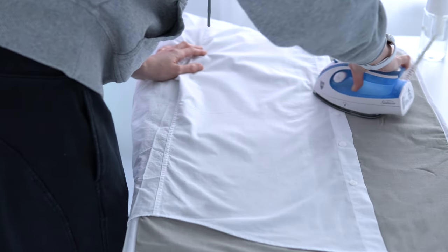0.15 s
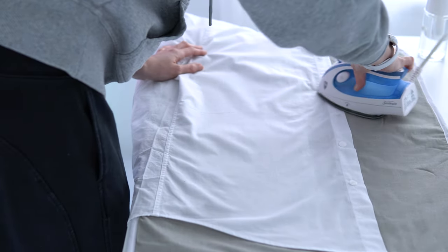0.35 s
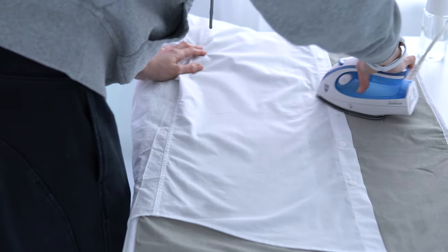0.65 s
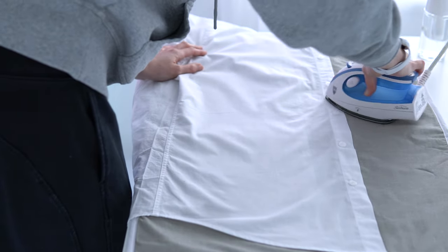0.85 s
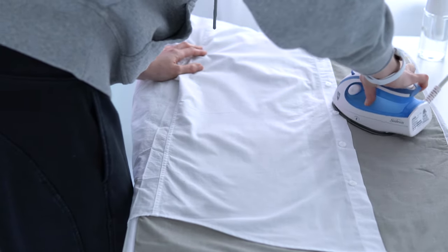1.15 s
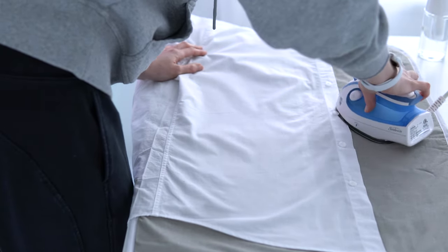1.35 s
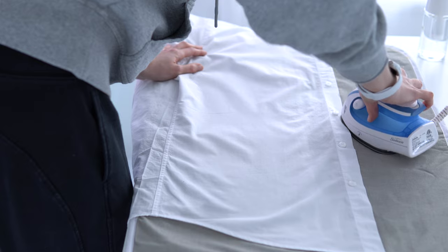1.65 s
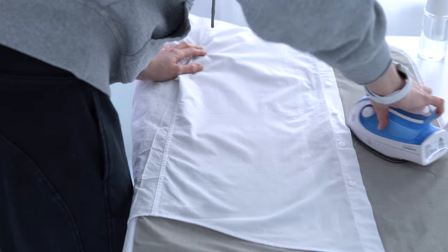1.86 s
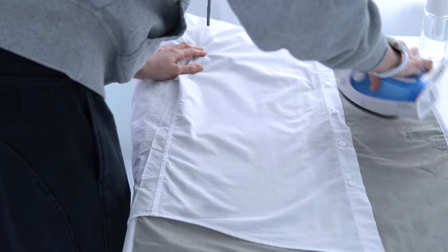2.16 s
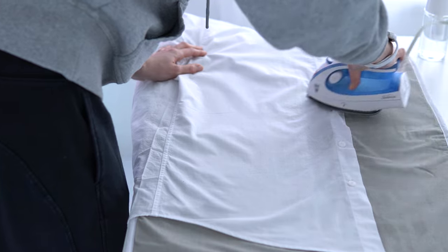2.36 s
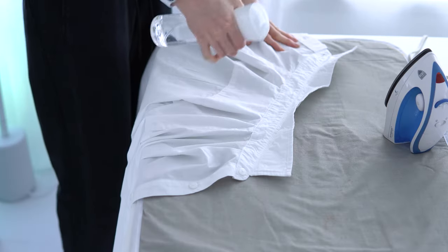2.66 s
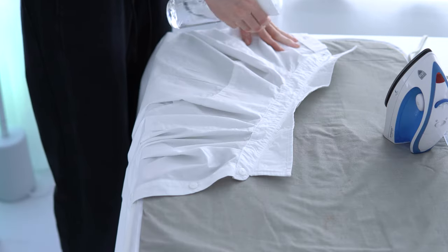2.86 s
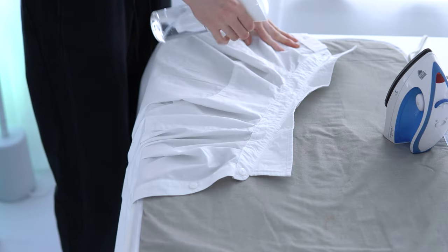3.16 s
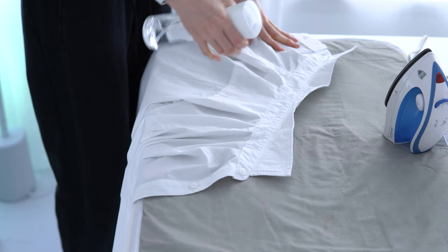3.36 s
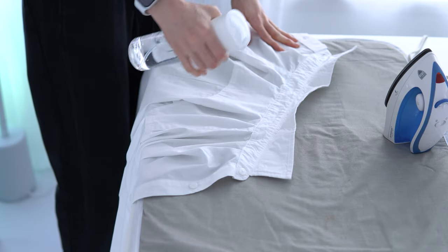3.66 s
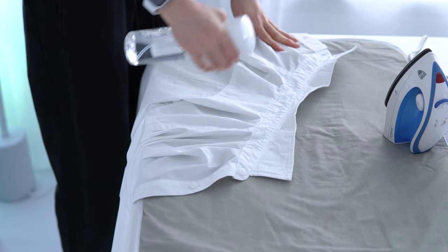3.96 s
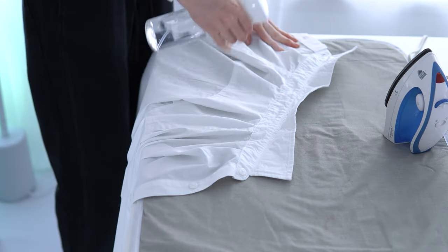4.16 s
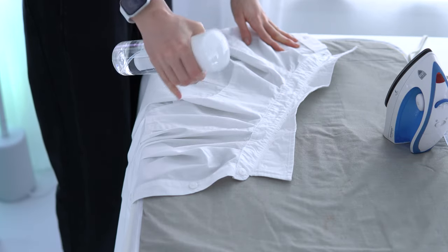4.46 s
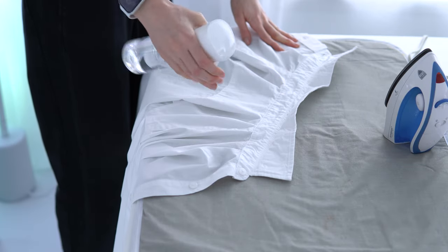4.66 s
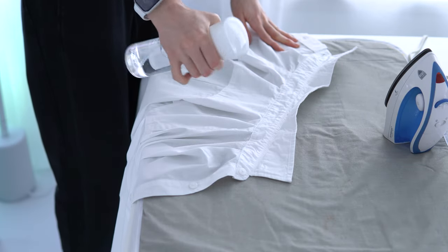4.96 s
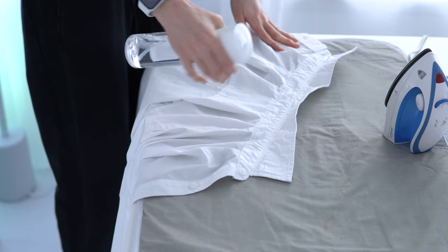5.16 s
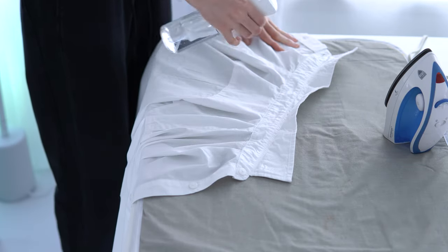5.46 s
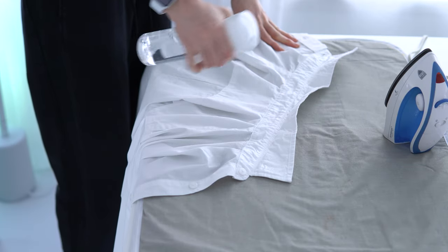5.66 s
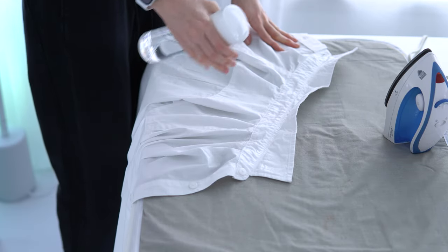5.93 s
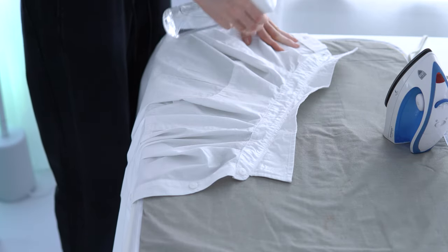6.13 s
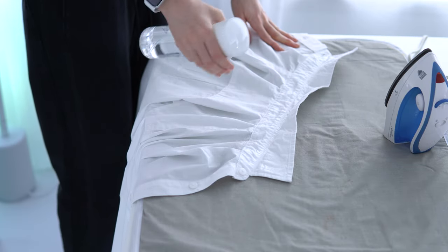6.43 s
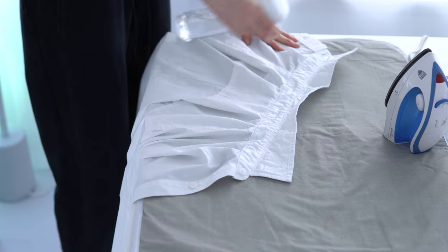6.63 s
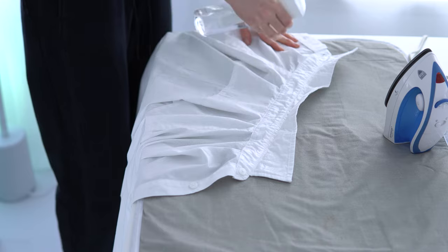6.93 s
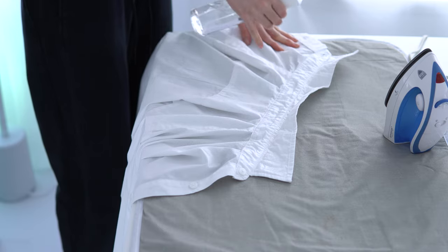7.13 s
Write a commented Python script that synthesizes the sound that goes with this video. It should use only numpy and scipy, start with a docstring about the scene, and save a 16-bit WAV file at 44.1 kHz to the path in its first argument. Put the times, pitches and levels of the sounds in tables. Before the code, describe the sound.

Soft swishing and scraping of an iron on fabric, followed by a spray bottle's short, long and short hisses in a quiet room.

```python
"""In a quiet room a shirt is ironed on a padded board. Sliding friction makes the sole swish over
the weave, judder at folds and scrape as it is swung aside. Then a hand-pumped mister gives three
hisses: pressure tears its jet into drops, so each opens at once and dies as the pressure runs out.
The pump's knocks excite the modes of the hollow bottle, and a hand smooths the fabric."""
import sys
import numpy as np
from scipy import signal
from scipy.fft import rfft, irfft, next_fast_len
from scipy.io import wavfile

SR = 44100
rng = np.random.default_rng(int(sys.argv[2]) if len(sys.argv) > 2 else 0)


def dump_mix(stems):
    """Bounce the given channels to the path in sys.argv[1] as a 16-bit WAV at rate SR."""
    frames = np.atleast_2d(stems).T  # one column per channel
    limited = np.clip(frames, -1, 1)  # hard clip at full scale
    pcm = np.round(limited * 32767).astype(np.int16)
    wavfile.write(sys.argv[1], SR, pcm)


N = 321489
TIME = np.arange(N) / SR

# Sprays. Each row: valve opening and shutting in seconds, relative level in dB, build-up in seconds.
SPRAYS = [(2.479, 3.025, -36.7, .003), (3.173, 6.453, -36.3, .08), (7.003, 7.4, -37.5, .08)]
# Squeezes that top up the pressure of the long spray. Each row: start in seconds, boost in dB.
SQUEEZES = [(3.5, 2.5), (4.06, 1.5), (4.32, 0.5), (4.925, 2.5), (5.625, 1.5)]
# Tilt of the hiss as the nozzle turns. Each row: time in seconds, treble over bass in steps of 4 dB.
NOZZLE_TILT = [(2.5, -0.2), (3.0, 0.2), (3.55, 0.74), (3.8, 0.9), (4.15, 0.36), (4.6, .5), (5.05, 0.4),
               (5.55, 0.3), (5.85, 1), (6.2, .1), (6.42, .4), (7.05, 0)]
# Passes of the iron. Each row: start and end in seconds, relative drag and swish levels at mid-pass
# in dB, swell with changing speed in dB per second.
PASSES = [(-.1, .05, -56, -69.5, -2), (.12, 0.31, -62, -66.5, 12), (0.425, .64, -59, -66, 6),
          (0.682, 0.985, -58.5, -65, -4), (0.995, 1.977, -59, -63, 4)]
# Folds. Each row: start in seconds, judder level in dB, rise and decay in seconds, chirp level in dB.
FOLDS = [(0.149, -57, 0.018, 0.053, -58), (0.333, -49.5, 0.011, 0.06, -61),
         (0.479, -47.5, .002, 0.08, -40.5), (0.636, -45.5, 0.012, 0.047, -42.5),
         (0.66, -55, 0.0024, 0.026, -60), (0.699, -51.5, .004, 0.022, -63), (0.754, -50, 0.016, 0.084, -51),
         (0.895, -48, 0.019, 0.064, -54), (1.025, -50.5, .007, 0.14, -52), (2.24, -53, .004, .03, -66)]
# The iron swung over the bare cover. Each row: time in seconds, scrape level in dB.
SWING = [(1.2, -63), (1.42, -62), (1.65, -60), (1.82, -53.5), (2.08, -49.5), (2.2, -50.5), (2.27, -47),
         (2.35, -53.5), (2.47, -55.5)]
# Weight shifting onto the board. Each row: peak time in seconds, level in dB, half-width in seconds.
THUDS = [(1.42, -73.5, 0.16), (2.155, -67, 0.068), (2.434, -70, .06)]
# Pump strokes. Each row: start in seconds, relative level in dB, decay in seconds, contact cut-off
# in Hz, ratio of knock to slip.
STROKES = [(4.764, -44, 0.079, 1100, 6.6), (6.881, -51, 0.04, 13000, 3.2), (6.938, -62, 0.04, 3000, 2.3)]
# Bottle modes. Each row: frequency in Hz, relative level in dB, time to fall 60 dB in seconds.
BOTTLE_MODES = [(770, -6, 0.021), (875, -5, 0.064), (1240, -4.5, 0.014), (1630, 1.5, 0.019),
                (2100, 0, 0.018), (2990, -5, 0.013), (4250, -2, 0.0067)]
# Mist and hand on the cloth. Each row: start and end in seconds, initial rush and tone levels in dB.
WETTING = [(2.479, 5.85, -50.0, -55.5), (6.88, 7.14, -60.5, -63)]
# Pitch of the hollow tone. Each row: time in seconds, frequency in Hz.
HOLLOW_PITCH = [(2.6, 900), (3.05, 980), (3.4, 870.8), (3.8, 862), (4.05, 910.6), (4.8, 874), (7.0, 895)]
# Presses on the cloth. Each row: start in seconds, level in dB, rise in seconds, fade in dB per second.
RUBS = [(.648, -52.5, 0.015, 110), (2.48, -67, .03, 6), (6.3, -70, 0.13, 3), (6.98, -72, .06, 28)]
# Reflections from things close by. Each row: delay in seconds, amplitude ratio.
ECHOES = [(.00277, 0.075), (.0046, 0.053), (.0083, 0.066)]

# Noise spectra of the sources. Each row: frequency in Hz, relative spectral density in dB.
JET_SPECTRUM = [(200, -42), (500, -19), (1000, -14.5), (1400, -7.5), (2200, -1), (3200, 0.9), (5200, -0.26),
                (7500, -0.45), (10000, -0.3), (12000, -1.8), (14000, -0.5), (16000, -3.5)]
DRAG_SPECTRUM = [(60, -44), (140, -14.5), (220, -6.5), (310, 4), (470, -0.5), (800, 4.5), (1200, 4),
                 (1900, -2), (2800, -11), (5000, -19.5), (12000, -30)]
SWISH_SPECTRUM = [(800, -15), (2500, 11.5), (4000, 5), (6500, 1), (10000, -1), (13500, -5), (16000, -9)]
BOARD_SPECTRUM = [(120, -52), (300, -19), (550, -17), (900, 0), (1400, 1.5), (2100, -1.5), (2800, -8),
                  (4500, -10.5), (5600, -31), (14000, -32)]
SCRAPE_SPECTRUM = [(300, -31), (630, -3), (900, -12.5), (1200, -1), (1550, -3.5), (2000, -4), (2700, -15.5),
                   (6000, -51)]
RUMBLE_SPECTRUM = [(30, -40), (60, -24), (80, -9), (103, 2.5), (135, -4), (250, 5.5), (600, -50)]
WET_CLOTH_SPECTRUM = [(120, -55), (280, -13), (550, -10.5), (800, -3), (1100, 0), (1800, -3), (3000, -16.5),
                      (8000, -31)]
PADDING_SPECTRUM = [(50, -32), (100, -12), (150, -12), (220, 0), (300, 0), (450, -1.5), (900, -5),
                    (3000, -38)]
AIR_SPECTRUM = [(25, -42), (60, -17.5), (105, -15.5), (140, -16.5), (225, -7), (320, 1.5), (550, 1),
                (900, 5), (1400, 1.5), (2500, -6), (5000, -12), (10000, -15.5), (16000, -19.5)]
# Resonances that colour the noise. Each row: centre in Hz, width in Hz, lift in dB.
NOZZLE_MODES = [(3540, 150, 1.5), (5140, 590, 1.0)]
BOARD_MODES = [(870, 40, 10), (1110, 52, 6.5), (1300, 45, 8), (1820, 58, 7.5), (2270, 17, 6)]
IRON_MODES = [(935, 43, 9), (900, 40, 11), (1900, 150, 0.5)]
ROOM_MODES = [(105, 12, 0), (158, 7, 8), (223.6, 10.7, 5), (286, 12.5, 5.5), (455, 18, 4)]
# Coherence of the sound field. Each row: frequency in Hz, correlation of left and right.
MIST_COHERENCE = [(200, 0.54), (900, 0.56), (2000, 0.86), (4000, 0.49), (5700, 0.29), (8000, .46),
                  (10000, .68), (13000, 0.83), (16000, 0.89)]
ROOM_COHERENCE = [(100, 1), (250, 0.97), (600, 0.76), (2000, 0.7), (3000, 0.46), (5000, 0.3), (14000, 0.32)]


def mist(dulling=0.16, nozzle_hz=4900, bounce_s=0.00093, pan_db=0.57):
    """Atomisation: the jet tears into fine drops, a smooth hiss that follows the pump's pressure."""
    flow, fallen_db = nozzle_flow()
    hiss = patchy(noise(JET_SPECTRUM, MIST_COHERENCE, NOZZLE_MODES), depth_db=0.63, per_s=8.3)
    # the treble beams forward and needs pressure, so the spectrum tips about its middle
    lows = signal.lfilter(*signal.butter(1, 5000, fs=SR), hiss)
    tilt = from_db(2 * (in_time(NOZZLE_TILT) - dulling * fallen_db))
    hiss = lows / tilt + (hiss - lows) * tilt
    # the nozzle's resonance comes and goes as the bottle turns
    resonance = signal.lfilter(*signal.iirpeak(nozzle_hz, 4, fs=SR), hiss)
    hiss = hiss + from_db(-25 + 4 * drift(3.9)) * resonance
    # interference with the bounce off the board forms a comb that moves with the hand
    hiss = hiss + 0.06 * delayed(hiss, bounce_s * (1 + 0.069 * drift(4)))
    flutter_db = 0.5 * drift(60)
    return hiss * flow * from_db(-0.1 + flutter_db + pan_db * np.array([[1], [-1]]))


def nozzle_flow(spurt=0.48, valve_s=0.0018, sag_db=2.0, sag_s=0.42, refill_s=0.014):
    """Stored pressure drives the jet. Returns the flow and its fall in dB since the valve shut."""
    flow, fallen_db = 0, 0
    for opens, shuts, db, build in SPRAYS:
        opening = ramp(opens, valve_s) * (spurt + (1 - spurt) * ramp(opens, build))
        release, dribble = from_db(-161 * since(shuts)), from_db(-21.5 - 57 * since(shuts))
        closing = np.maximum(release, dribble)
        settled_db = db - sag_db * (1 - np.exp(-since(opens) / sag_s))
        flow = flow + opening * closing * from_db(settled_db)
        fallen_db = np.where(TIME < opens, fallen_db, -20 * np.log10(closing))
    for start, boost_db in SQUEEZES:
        push = ramp(start, rise_s=0.07) * np.exp(-since(start) / 0.85)
        refill_dip = 0.33 * np.exp(-((TIME - start + refill_s / 2) / refill_s) ** 2)
        flow = flow * from_db(boost_db * (push - refill_dip))
    return flow, np.minimum(fallen_db, 30)


def iron(grain_db=0.13):
    """Friction at the sole sounds as bumps and sliding noise; it stops as the spraying starts."""
    bumps = judder()
    sliding = (glide() + swing()) * from_db(grain_db * drift(150))
    return (sliding + bumps) * (1 - ramp(SPRAYS[0][0], rise_s=0.03))


def judder(rough_db=1.0, chirp_s=0.0092):
    """Stick and slip: at each fold the sole catches with a short chirp and shakes the board."""
    force, catch = 0, 0
    for start, db, rise, decay, chirp_db in FOLDS:
        onset, age = ramp(start, rise), since(start + rise)
        force = force + from_db(db) * onset * np.exp(-age / decay)
        catch = catch + from_db(chirp_db) * onset * np.exp(-age / chirp_s)
    board = noise(BOARD_SPECTRUM, ROOM_COHERENCE, BOARD_MODES) * from_db(rough_db * drift(400))
    return force * board + catch * narrow_noise(1920, width_hz=105)


def glide(rise_s=0.04, release_db_per_s=94):
    """Friction noise follows speed: the weave swishes, and the drag on the padding lingers after it."""
    drag, swish = 0, 0
    for start, end, drag_db, swish_db, swell in PASSES:
        speed_db = swell * (np.clip(TIME, start, end) - (start + end) / 2)
        lingering = held(start, end, rise_s, 0.085 * release_db_per_s)
        brief = held(start, end, rise_s, release_db_per_s)
        drag = np.maximum(drag, from_db(drag_db + speed_db) * lingering)
        swish = np.maximum(swish, from_db(swish_db + speed_db) * brief)
    weave = patchy(noise(SWISH_SPECTRUM, ROOM_COHERENCE), depth_db=1.2, per_s=23)
    padding = noise(DRAG_SPECTRUM, ROOM_COHERENCE, ROOM_MODES[2:])
    return from_db(3.5) * drag * padding + from_db(5.5) * swish * weave


def swing(shell_hz=1088, shell_peak_db=-47.5):
    """Forced vibration: the harder the sole scrapes, the more its shell sings; the board rumbles."""
    scrape_db = in_time(SWING)
    shell_db = shell_peak_db + 1.5 * (scrape_db - scrape_db.max())
    shell = from_db(shell_db) * narrow_noise(shell_hz, width_hz=180)
    scrape = from_db(scrape_db) * noise(SCRAPE_SPECTRUM, ROOM_COHERENCE, IRON_MODES)
    load = sum(from_db(db) / (1 + ((TIME - peak) / width) ** 2) for peak, db, width in THUDS)
    return scrape + shell + load * noise(RUMBLE_SPECTRUM, ROOM_COHERENCE)


def pump(slips_per_s=2600, spread=0.4, tick_db=3.5, ring_db=-7.0):
    """Impact excitation: each stroke is a knock and a dying run of slips that ring the bottle's modes."""
    mid, side = (rng.random((2, N)) < slips_per_s / SR) * rng.choice([-1, 1], (2, N))
    slips = mid + spread * side * [[1], [-1]]
    force = 0
    for start, db, decay, cut_hz, knock in STROKES:
        stroke = slips * (TIME > start) * np.exp(-since(start) / decay)
        stroke[:, round(start * SR)] += knock
        force = force + from_db(db) * low_pass(stroke + 1e-18, cut_hz)
    body = sum((-1) ** k * from_db(db) * ring(force, hz, t60)
               for k, (hz, db, t60) in enumerate(BOTTLE_MODES))
    tick = force - low_pass(force, 1500)   # the small shell radiates little bass
    return from_db(ring_db) * body + from_db(tick_db) * tick


def wet_cloth(rush_fade_db_per_s=2.5, tone_fade_db_per_s=1.3):
    """Mist and hand on fabric give a broadband rush; a hollow resonance shifts as the bottle moves."""
    rush, hollow = 0, 0
    for start, end, rush_db, tone_db in WETTING:
        shape = held(start, end, rise_s=0.0045, release_db_per_s=20)
        rush = rush + shape * from_db(rush_db - rush_fade_db_per_s * since(start))
        hollow = hollow + shape * from_db(tone_db - tone_fade_db_per_s * since(start))
    tone = narrow_noise(in_time(HOLLOW_PITCH), width_hz=142) * from_db(0.6 * drift(9))
    fabric = noise(WET_CLOTH_SPECTRUM, ROOM_COHERENCE)
    grain = from_db(-drift(90))
    return (rush * fabric + hollow * tone) * grain


def rubbing():
    """Damped friction: hand and iron press the cloth into the padding, a dull rub that eases off."""
    press = sum(from_db(db) * held(start, start, rise, fade) for start, db, rise, fade in RUBS)
    return press * noise(PADDING_SPECTRUM, ROOM_COHERENCE, ROOM_MODES[1:4])


def room(x, t60=0.12, tail_db=-9.0):
    """Reflection: a few near echoes and a short diffuse tail that differs at each side."""
    age = TIME[:SR // 2]
    tail = rng.standard_normal((2, len(age))) * from_db(-60 * age / t60) * (age > 0.003)
    response = from_db(tail_db) * tail / np.sqrt(np.sum(tail ** 2, axis=1, keepdims=True))
    for delay, share in ECHOES:
        response[:, round(delay * SR)] += share
    return signal.oaconvolve(x, response, axes=1)[:, :N]


def still_air(level_db=-57.5):
    """Ambient noise, coloured by the room's standing waves."""
    return from_db(level_db) * noise(AIR_SPECTRUM, ROOM_COHERENCE, ROOM_MODES)


def noise(spectrum, coherence, modes=()):
    """Spectral shaping: stereo noise lifted at its resonances; the mid has rms 1."""
    size = next_fast_len(N, True)
    freqs = np.geomspace(10, SR / 2, 1500)
    lift_db = sum(db / (1 + (2 * (freqs - hz) / width) ** 2) for hz, width, db in modes)
    mid_gain = from_db(at_hz(spectrum, freqs) + lift_db)
    alike = np.clip(at_hz(coherence, freqs), 0, 0.99)
    side_gain = mid_gain * np.sqrt((1 - alike) / (1 + alike))
    bins = np.fft.rfftfreq(size, 1 / SR)
    gains = [np.interp(bins, freqs, gain) for gain in (mid_gain, side_gain)]
    white = rng.standard_normal((2, 2 * len(bins))).view(complex)
    mid, side = irfft(white * gains, size)[:, :N]
    return np.array([mid + side, mid - side]) / mid.std()


def narrow_noise(hz, width_hz, spread=0.22):
    """A noise-driven resonance acts as a carrier whose amplitude and phase wander; hz may move."""
    phase = 2 * np.pi * np.cumsum(np.broadcast_to(hz, N)) / SR
    a, b = low_pass(rng.standard_normal((2, N)), width_hz / 2)
    cos, sin = np.cos(phase), np.sin(phase)
    mid, side = a * cos + b * sin, a[::-1] * cos + b[::-1] * sin
    return unit_rms(mid) + spread * unit_rms(side) * [[1], [-1]]


def patchy(x, depth_db, per_s):
    """Amplitude modulation: octave bands swell and fade, each on its own."""
    size = next_fast_len(N)
    spectrum, hz = rfft(x, size), np.fft.rfftfreq(size, 1 / SR)
    octave = np.log2(np.clip(hz / 1000, 1, 16))
    bands = (irfft(spectrum * np.maximum(1 - np.abs(octave - k), 0), size)[:, :N] for k in range(5))
    return sum(band * from_db(depth_db * drift(per_s)) for band in bands)


def ring(force, hz, t60):
    """A damped oscillator: a unit impulse starts a decaying sine of height 1."""
    r, w = from_db(-60 / (t60 * SR)), 2 * np.pi * hz / SR
    return signal.lfilter([0, np.sin(w)], [1, -2 * r * np.cos(w), r * r], force + 1e-18)


def low_pass(x, cut_hz):
    """A second-order low-pass."""
    return signal.sosfilt(signal.butter(2, cut_hz, fs=SR, output="sos"), x)


def delayed(x, seconds):
    """Propagation delay, steady or moving, on both channels."""
    return np.array([np.interp(TIME - seconds, TIME, side, left=0) for side in x])


def drift(per_s):
    """A random fluctuation of rms 1, joining per_s draws a second."""
    draws = rng.standard_normal(8192)
    return unit_rms(np.interp(TIME * per_s, np.arange(len(draws)), draws))


def held(start, end, rise_s, release_db_per_s):
    """Linear attack, hold and exponential release."""
    return ramp(start, rise_s) * from_db(-release_db_per_s * since(end))


def ramp(start, rise_s):
    """A linear rise from 0 to 1."""
    return np.clip((TIME - start) / rise_s, 0, 1)


def since(start):
    """Seconds elapsed since start, 0 before it."""
    return np.maximum(TIME - start, 0)


def in_time(rows):
    """A curve interpolated at every sample."""
    return np.interp(TIME, *np.transpose(rows))


def at_hz(rows, hz):
    """A curve interpolated along a log-frequency axis."""
    known_hz, values = np.transpose(rows)
    return np.interp(np.log(hz), np.log(known_hz), values)


def from_db(db):
    """Decibels to amplitude ratio."""
    return 10 ** (np.asarray(db) / 20)


def unit_rms(x):
    """Normalisation to unit power."""
    return x / np.sqrt(np.mean(x ** 2) + 1e-20)


def scene():
    """Superposition: the direct sound, its reflections and the still air add."""
    direct = mist() + wet_cloth() + rubbing() + iron() + pump()
    return direct + room(direct) + still_air()


def record(dry, low_hz=45, high_hz=15750):
    """Band limiting: the deepest bass is shed and the top is cut steeply."""
    lean = signal.sosfilt(signal.butter(2, low_hz, "high", fs=SR, output="sos"), dry)
    return signal.sosfilt(signal.ellip(12, 0.1, 70, high_hz, fs=SR, output="sos"), lean)


dry = scene()
out = record(dry)
dump_mix(out)
```